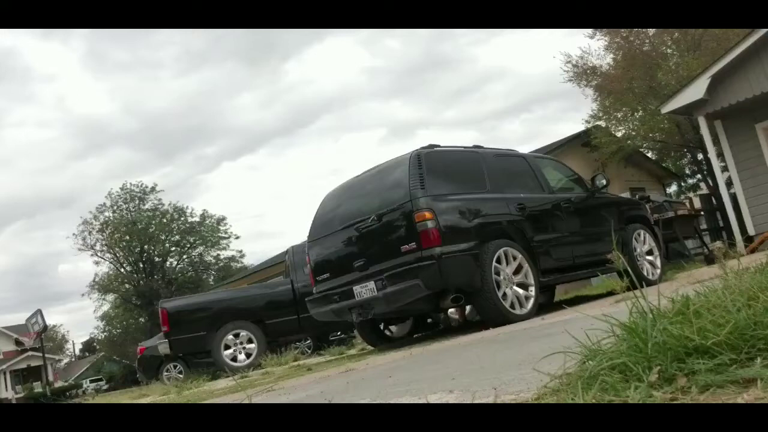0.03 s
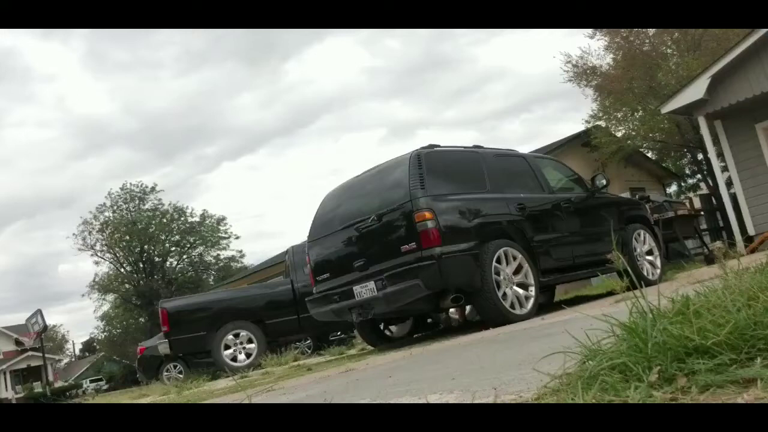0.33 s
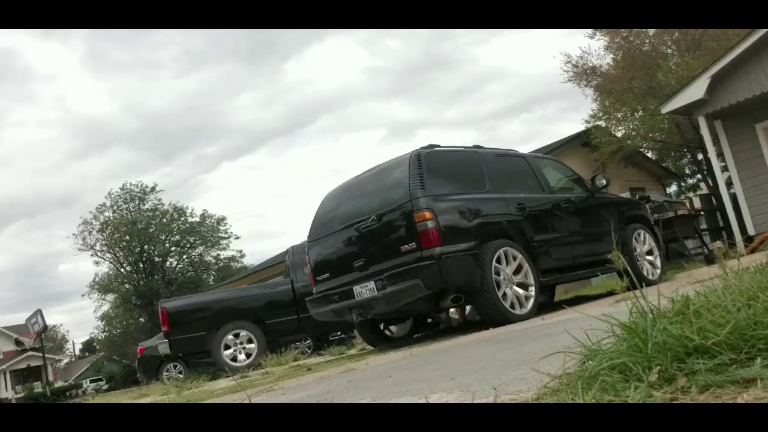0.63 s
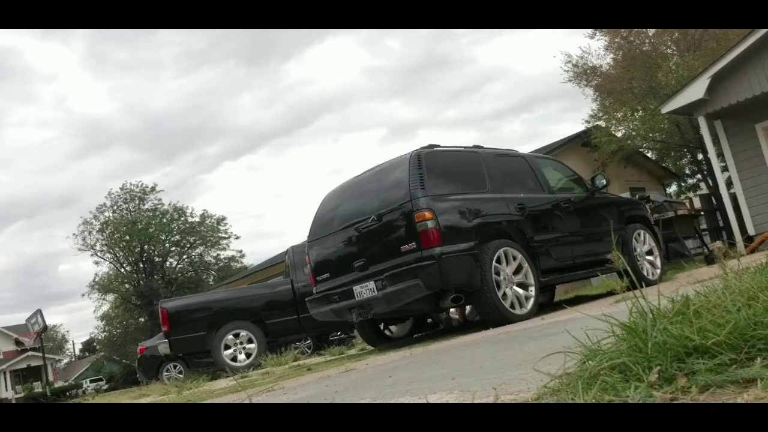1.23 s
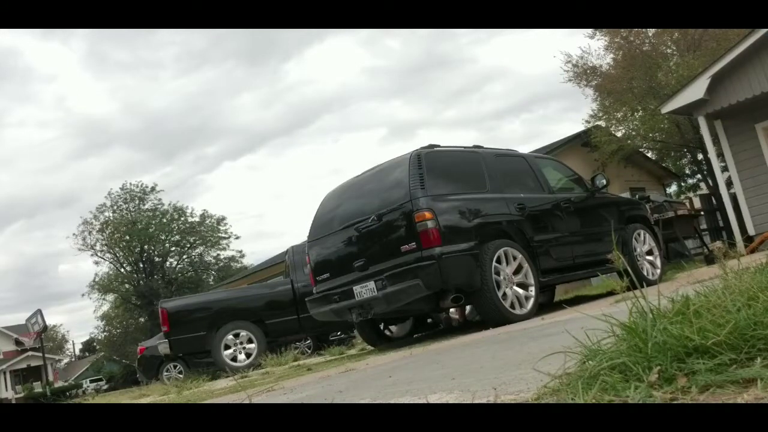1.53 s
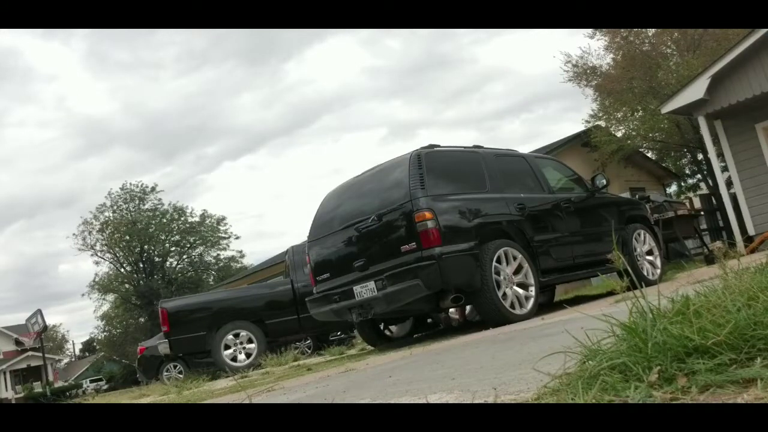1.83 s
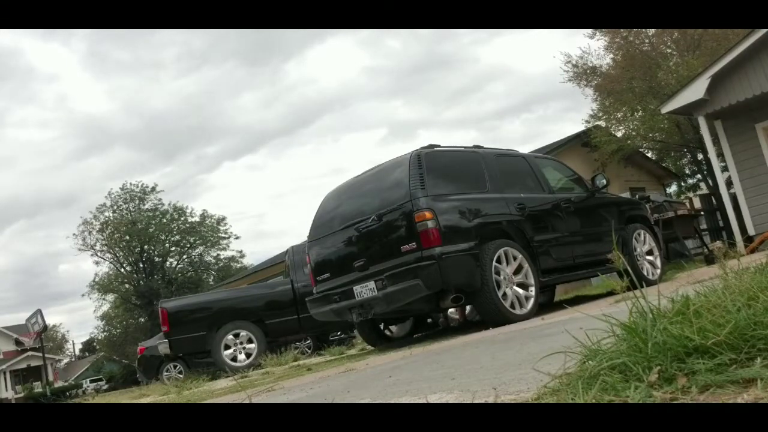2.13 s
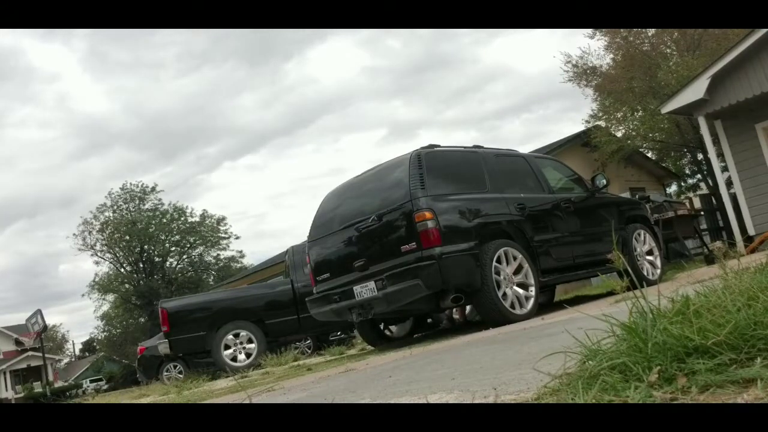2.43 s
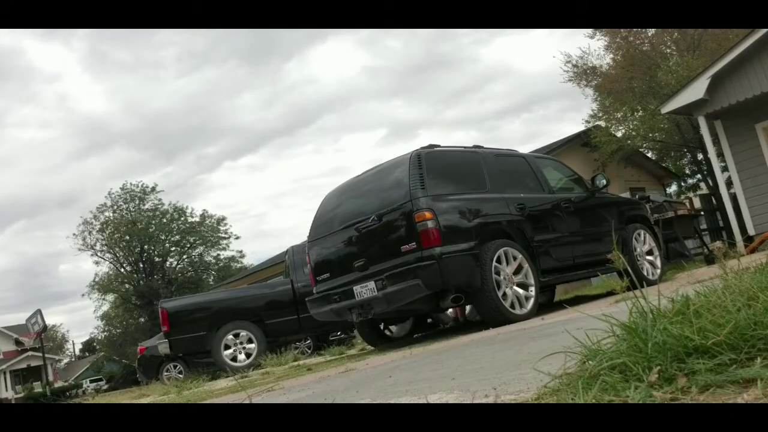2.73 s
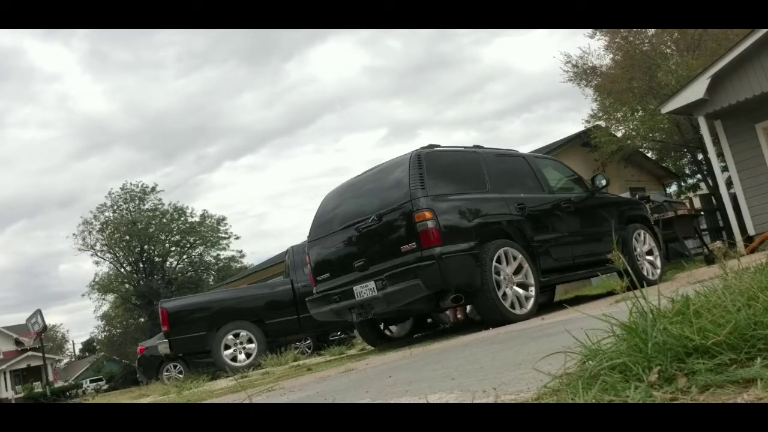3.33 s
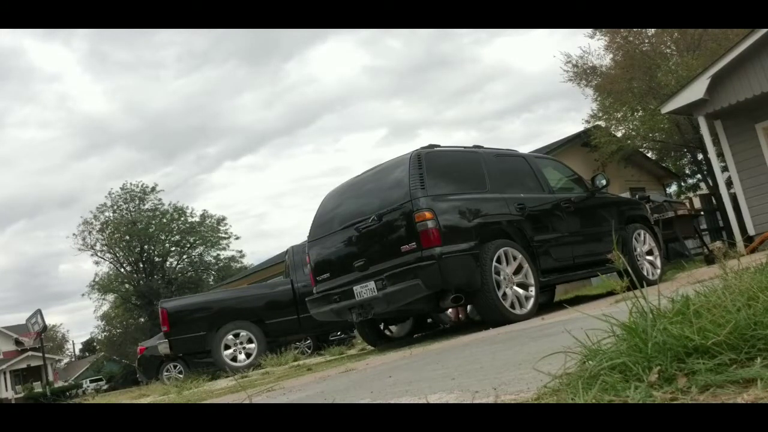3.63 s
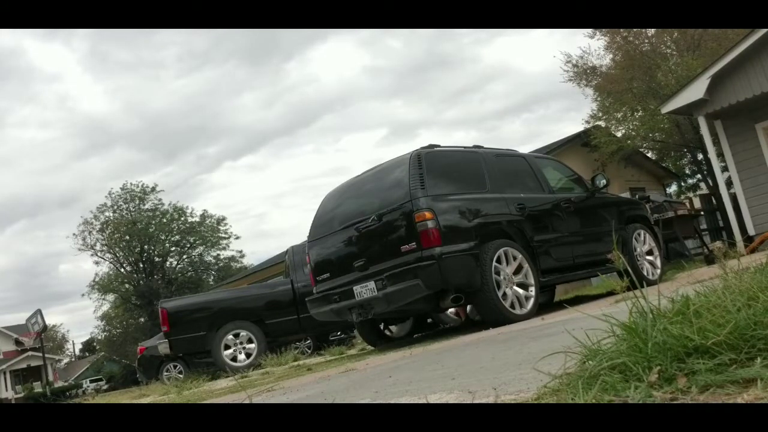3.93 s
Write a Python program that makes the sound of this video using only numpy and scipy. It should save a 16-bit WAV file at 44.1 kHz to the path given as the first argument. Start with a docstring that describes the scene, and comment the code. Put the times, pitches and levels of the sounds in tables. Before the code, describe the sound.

A V8 engine starts in a driveway: the starter clacks and cranks briefly, then it catches with a rasping burst and drops to a loud, lumpy idle with spitting hiss. A second engine idles faintly farther off.

```python
"""An open-exhaust V8 starts from cold in a driveway, heard on a stereo pair of microphones.
The starter clacks in and labours over four compression strokes; the engine catches with a rasping
flare and sinks to a lumpy fast idle. Each firing thumps down the pipe; a leak on one bank spits hiss.
Ground, house and vehicles throw back short echoes. Further off, a second V8 idles throughout."""
import sys
import numpy as np
from scipy import signal
from scipy.fft import rfft, irfft
from scipy.io import wavfile

SR = 44100
rng = np.random.default_rng(int(sys.argv[2]) if len(sys.argv) > 2 else 0)


def generate_wav(sig):
    """Save sig (samples, or channels by samples) to the path in sys.argv[1] as 16-bit PCM at SR."""
    pcm = np.round(np.clip(np.atleast_2d(sig).T, -1, 1) * 32767).astype(np.int16)
    wavfile.write(sys.argv[1], SR, pcm)


N = 176400
T = np.arange(N) / SR
HZ = np.fft.rfftfreq(N, 1 / SR)
STARTER_ON_S, STARTER_OFF_S, CATCH_S = 0.674, 1.3, 1.484


def amp(db):
    """Decibels to gain."""
    return 10 ** (np.asarray(db) / 20)


def unit_rms(x, start_s=0):
    """Scales to rms 1, judged from the start time on."""
    return x / np.sqrt(np.mean(x[..., T >= start_s] ** 2) + 1e-20)


def spectrum(points):
    """Interpolates a table over log frequency."""
    f, value = np.transpose(points)
    return np.interp(np.log(HZ + 1), np.log(f + 1), value)


def colour(x, db):
    """Minimum-phase filter with the given gain in dB."""
    cepstrum = irfft(np.log(amp(np.maximum(db, -100))), N)
    cepstrum[1:N // 2] *= 2
    cepstrum[N // 2 + 1:] = 0
    taps = irfft(np.exp(rfft(cepstrum)), N)[:8192]
    return signal.fftconvolve(np.atleast_2d(x), taps[None], axes=1)[:, :N]


def resonate(x, hz, width_hz):
    """A steep resonance that follows hz, at rms 1."""
    turn = np.exp(2j * np.pi * np.cumsum(hz * np.ones(N)) / SR)
    r = np.exp(-np.pi * width_hz / SR)
    return unit_rms((turn * signal.lfilter([1], [1, -2 * r, r * r], x / turn)).real)


def clicks(times, db):
    """One impulse at each time."""
    at = np.round(times * SR).astype(int)
    keep = (at >= 0) & (at < N)
    return np.bincount(at[keep], amp(db)[keep], N)


def puffs(train, rise_s, fall_s):
    """Each impulse opens quickly and dies away."""
    shape = (1 - np.exp(-T / rise_s)) * np.exp(-T / fall_s)
    return signal.fftconvolve(train, shape / shape.max())[:N]


# Likeness of the two microphones: f/Hz, correlation
MIC_LIKENESS = [(30, 1), (250, 0.9), (500, 0.991), (1000, 0.98), (1800, 0.12), (4000, 0.145),
                (12000, 0.024)]
def noise():
    """White noise at the pair, less alike in the treble."""
    left, other = rfft(rng.standard_normal((2, N)))
    same = np.clip(spectrum(MIC_LIKENESS), -1, 1)
    return irfft(np.array([left, same * left + np.sqrt(1 - same ** 2) * other]), N)


# Cylinders in firing order; one bank hisses most: thump/dB, delay/ms, hiss/dB, burble/dB
CYLINDERS = [(-2, 1.575, -0.5, 0), (2.5, 0.478, -6.5, -14.5), (-1.5, 1.645, 2.5, -20),
             (1.5, 0.309, -18, -24), (5.5, 0.037, -4, -9.5), (-5.5, 1.47, -2.5, -18.5),
             (4, 0.52, -8, -20.5), (-3.5, 1.634, -0.5, -11)]
def firings(rate_hz, start_s, level_spread_db=0.7, time_spread_ms=0.15, hiss_spread_db=1.8):
    """Eight unequal cylinders fire in turn, each firing a little different by chance."""
    count = np.cumsum(rate_hz * (T >= start_s)) / SR
    k = np.arange(int(count[-1]) + 1)
    thump_db, delay_ms, hiss_db, burble_db = np.array(CYLINDERS)[k % len(CYLINDERS)].T
    spreads = [time_spread_ms, level_spread_db, hiss_spread_db]
    slip_ms, stray_db, hiss_stray_db = (rng.standard_normal((512, 3))[k] * spreads).T
    times = T[np.searchsorted(count, k, "right")] + (delay_ms + slip_ms) / 1000
    return times, thump_db + stray_db, hiss_db + hiss_stray_db, burble_db + stray_db


# Colours of the distant engine's thump and rush: f/Hz, relative level/dB
FAR_THUMP = [(25, -34.5), (55, -5.5), (84, 0.5), (130, -4), (190, -9), (260, -18), (450, -21), (1000, -27),
             (4000, -95)]
FAR_RUSH = [(30, -14), (60, -11.5), (110, 2), (180, -4.5), (280, -13.5), (450, -16.5), (780, -15.5),
            (1000, -18.5), (1480, -26), (2200, -37.5), (4000, -50.5), (14000, -52.5)]
def far_engine(firing_hz=83.4):
    """A second V8 idles steadily, dulled by distance."""
    times, thump_db, _, _ = firings(firing_hz, start_s=0)
    thump = unit_rms(colour(clicks(times, thump_db), spectrum(FAR_THUMP)))
    rush = unit_rms(colour(noise(), spectrum(FAR_RUSH)))
    return amp(-39.5) * thump + amp(-40) * rush


# The pinion engaging, then four compression strokes: t/s, rattle/dB, length/s, chug/dB
STROKES = [(0.673, -34.5, .05, -40), (1.044, -40, .07, -42), (1.181, -36.5, 0.055, -37),
           (1.306, -38, 0.05, -40), (1.386, -37, 0.085, -38.5)]
# Colour of the gear rattle: f/Hz, relative level/dB
GEAR_RATTLE = [(330, -30), (480, -0.5), (830, -7.5), (1200, -2.5), (1970, -8.5), (2830, -8.5), (4200, -9.5),
               (4900, -3.5), (6500, -12.5), (7700, -2.5), (8700, -17.5), (12700, -14.5), (15000, -48)]
# Rate of meshing teeth, before the strokes slow it: t/s, f/Hz
GEAR_MESH = [(.674, 390), (.71, 730), (.76, 870), (.81, 980), (.86, 1100), (.91, 980), (.96, 890),
             (1.03, 780), (1.1, 1150), (1.47, 940)]
# Partials of the gear whine: multiple of the mesh rate, level/dB
WHINE_PARTIALS = [(1, -45), (2, -51), (3, -53), (6, -54), (9, -58)]
def starter(whirr_db=-52, free_spin_db=-45.5, rise_s=0.0037, sag=0.15):
    """The gears spin up with a blurred whine and a rattle; each compression slows them and chugs."""
    load, squeeze, since = np.zeros((3, N))
    for start, rattle_db, length, chug_db in STROKES:
        stroke = np.clip((T - start) / rise_s, 0, 1) * np.exp(-((T - start) / length) ** 2)
        load += amp(rattle_db) * stroke
        squeeze += amp(chug_db) * stroke
        since = np.where(T >= start, T - start, since)
    on = np.clip((T - STARTER_ON_S) / 0.0104, 0, 1) * (T < STARTER_OFF_S)
    free_spin = np.exp(-((T - 0.8924) / 0.1) ** 2)  # whirr and whine swell as the starter runs free
    whirr = on * (amp(whirr_db) + amp(free_spin_db) * free_spin)
    rattle = unit_rms(colour(noise(), spectrum(GEAR_RATTLE))) * (load + whirr)
    chug_hz = 330 + 460 * np.exp(-since / 0.063)  # a hollow resonance sinks after each stroke
    chug = squeeze * resonate(noise(), chug_hz, width_hz=510)
    mesh_hz = np.interp(T, *np.transpose(GEAR_MESH)) * (1 - sag * load / load.max())
    whine = sum(amp(db) * resonate(noise(), k * mesh_hz, width_hz=k * 55) for k, db in WHINE_PARTIALS)
    return rattle + chug + whine * on * (0.5 + 0.5 * free_spin)


# Rumble of air in the pipe: f/Hz, relative level/dB
CRANK_RUMBLE = [(20, -20), (45, -10), (80, 2.5), (130, -2.5), (220, -17), (400, -34), (2000, -57)]
def cranking(rise_s=0.14):
    """The turning engine pumps air through the pipe before it fires."""
    swell = np.clip((T - STARTER_ON_S) / rise_s, 0, 1) * (T < STARTER_OFF_S)
    return amp(-38) * swell * unit_rms(colour(noise(), spectrum(CRANK_RUMBLE)))


def crackling(grains_per_s=2700, spread_db=18, share=0.25):
    """Crackling hiss from an exhaust leak on one bank: noise with a dense scatter of sharp grains."""
    size = amp(spread_db * np.minimum(rng.exponential(1, N), 4))
    grains = unit_rms(size * (rng.random(N) < grains_per_s / SR) * rng.choice([-1, 1], N))
    return unit_rms(noise() + share * grains)


def thumps(times, db, corner_hz=150):
    """Strong pressure pulses steepen in the pipe: above the corner their dB differences double."""
    lowpass_db = -10 * np.log10(1 + (HZ / corner_hz) ** 2)
    soft, steep = clicks(times, db), clicks(times, 2 * db)
    return -(steep + colour(soft - steep, lowpass_db))


def burble(times, db, hz=231, rise_s=0.003, fall_s=0.008):
    """Each firing leaves a throaty ring in the pipe; one cylinder rings it hardest."""
    ring = (1 - np.exp(-T / rise_s)) * np.exp(-T / fall_s) * np.sin(2 * np.pi * hz * T)
    return -amp(-16.5) * signal.fftconvolve(clicks(times, db), ring / ring.max())[:N]


# Firing rate of the near engine: t/s, f/Hz
FIRING_RATE = [(1.48, 70.35), (1.56, 60.54), (1.68, 75.77), (1.8, 82.19), (2.0, 84.67), (2.2, 82.38),
               (2.5, 78.62), (2.8, 75.0), (3.1, 71.81), (3.5, 68.35), (4.0, 64.0)]
# Lumpiness, easing as the engine settles: t/s, factor on the thumps' dB and the burble's gain
LOPE = [(1.5, 0.52), (2.3, 0.846), (3.0, 0.64), (3.5, 0.4)]
# Relative strength of the firings: t/s, thump/dB, rasp/dB, hiss/dB
EFFORT = [(1.482, -3.5, 8.5, 7), (1.513, -2.5, 0, 5.5), (1.526, 5, 11.5, 10.5), (1.6, 5.5, 12.5, 9),
          (1.7, 6, 10.5, 6.5), (1.861, 4.5, 5, 1), (2.0, 3, 0.5, 1), (2.5, 0.5, 1, -2), (3.1, 1, 0, -2.5),
          (4.0, 1.5, -1, -2)]
# Resonances of the pipe: f/Hz, width/Hz, lift/dB
PIPE_MODES = [(346.4, 39.4, 8), (423, 19, 1), (543, 22, 2), (649.8, 34.6, 12.5), (792, 31, 5), (975, 30, 5),
              (1172, 28.5, 4.5), (1357, 41.5, 3), (2499, 39, 2.5)]
# Colours of the thump, the turbulent gas in the pipe and the leak's jet: f/Hz, relative level/dB
THUMP_COLOUR = [(20, -38.5), (35, -11), (52, 3), (68, 7), (88, 4.5), (115, 2.5), (145, -5), (180, -2.5),
                (250, -10.5), (320, -21.5), (430, -23), (550, -50.5), (900, -48.5), (2000, -67),
                (8000, -62)]
RASP_COLOUR = [(25, -26.5), (60, -2.5), (120, -5.5), (220, -5.5), (320, -10.5), (430, -6.5), (600, -18.5),
               (1000, -21.5), (1600, -22), (3000, -29), (6000, -28.5), (16000, -96)]
HISS_COLOUR = [(300, -52), (1000, -8), (2000, -7), (2700, 0), (3200, -5), (4100, -2.5), (5500, 1),
               (7500, 1.5), (8700, -2.5), (12000, 0), (15000, -2)]
def near_engine(hiss_lead_s=0.0018, steady_gas=0.61, steady_jet=0.505):
    """In the driveway, every firing sends a thump and a rasping puff down the pipe and spits hiss."""
    rate_hz = np.interp(T, *np.transpose(FIRING_RATE))
    times, thump_db, hiss_db, burble_db = firings(rate_hz, CATCH_S)
    thump_db = thump_db * np.interp(times, *np.transpose(LOPE))
    effort_s, *levels = np.transpose(EFFORT)
    push, gas_gain, jet_gain = (amp(np.interp(T, effort_s, db)) for db in levels)
    running = T >= CATCH_S
    pipe_db = sum(db / (1 + (2 * (HZ - hz) / width) ** 2) for hz, width, db in PIPE_MODES)
    thump = colour(thumps(times, thump_db) * push, spectrum(THUMP_COLOUR) + pipe_db)
    ring = push * np.interp(T, *np.transpose(LOPE)) * burble(times, burble_db)
    gas = puffs(clicks(times, thump_db), rise_s=0.00019, fall_s=0.03) + steady_gas * running
    rasp = colour(gas * gas_gain * noise(), spectrum(RASP_COLOUR) + pipe_db)
    escapes = clicks(times - hiss_lead_s, hiss_db)  # hiss is out before the thump has left the pipe
    jet = puffs(escapes, rise_s=0.00079, fall_s=0.00618) + steady_jet * running
    hiss = colour(jet * jet_gain * crackling(), spectrum(HISS_COLOUR))
    return (amp(-14) * unit_rms(thump, start_s=2.86) + ring
            + amp(-28.5) * unit_rms(rasp, start_s=1.675)
            + amp(-34.5) * unit_rms(hiss, start_s=3))


# Sharpest spits of the exhaust hiss: t/s, relative level/dB
SPITS = [(1.4853, -16.5), (1.511, -20), (1.8043, -21), (2.0086, -18.5), (2.4219, -22), (2.7317, -22),
         (2.837, -22), (2.919, -24), (3.055, -20.5), (3.2534, -24), (3.367, -24), (3.7504, -21.5),
         (3.8426, -22)]
def spits(ticks_per_s=35):
    """Now and then the hot exhaust cracks out brightly, among small random ticks."""
    bright_db = spectrum([(500, -26), (3000, -13), (7000, -0.5), (14000, -6.0)])
    bright = unit_rms(colour(crackling(), bright_db))
    size = amp(-34.5 + 0.5 * np.minimum(rng.exponential(1, N), 2))
    ticks = size * (rng.random(N) < ticks_per_s / SR) * (T > CATCH_S)
    cracks = amp(-3.5) * puffs(clicks(*np.transpose(SPITS)), rise_s=0.00062, fall_s=0.0038)
    return bright * (cracks + puffs(ticks, rise_s=0.00043, fall_s=0.0013))


# Barks as the engine catches: t/s, f/Hz, width/Hz, level/dB, fall/s
BARKS = [(1.491, 2620, 150, -35, .012), (1.532, 1260, 350, -25, .022), (1.55, 2700, 900, -25, .012),
         (1.565, 620, 400, -23, .03), (1.58, 1150, 600, -25, .011)]
def barks(rise_s=0.0011):
    """The first hard firings bark and ring briefly in the pipe."""
    return sum(resonate(noise(), hz, width) * puffs(clicks(np.array([start]), [db]), rise_s, fall)
               for start, hz, width, db, fall in BARKS)


# Two snaps late in the idle: t/s, level/dB
SNAPS = [(3.630, -16), (3.636, -21)]
def snaps():
    """One very short, very bright double tick."""
    envelope = puffs(clicks(*np.transpose(SNAPS)), rise_s=0.0002, fall_s=0.0012)
    return envelope * resonate(noise(), hz=13000, width_hz=4000)


# Echoes off ground, house and vehicles: delay t/s, level/dB
ECHOES = [(0.0168, -19), (0.0334, -12.5), (.052, -31.5)]
def driveway(x, t60_s=0.399, scatter_db=-7):
    """The open-air spot adds a few hard echoes and a short scatter above the bass."""
    tail_db = spectrum([(300, -30), (1000, 0)]) + spectrum([(3000, -1.5), (14000, -5.5)])
    tail = colour(noise(), tail_db) * amp(-60 * T / t60_s) * (T > 0.006)
    taps = amp(scatter_db) * tail / np.linalg.norm(tail[0]) + clicks(*np.transpose(ECHOES))
    return x + signal.fftconvolve(x, taps, axes=1)[:, :N]


# Left microphone over the right: f/Hz, level/dB
LEFT_LEVEL = [(60, 1.1), (280, 1.8), (550, .7), (1000, 1.8), (2300, 3.3), (5000, 2.6), (8000, 4.7),
              (14000, 4)]
# Lead of the left microphone: f/Hz, phase/rad
LEFT_LEAD = [(20, 0), (70, .1), (250, .33), (550, .6), (1000, 1.4), (1640, 2.2), (2840, 6.2), (4000, 8.6),
             (5680, 12), (8000, 16.6), (11500, 22.5), (15000, 29)]
def scene():
    """Both engines, near and far, stand a little left of the microphones' axis."""
    near = near_engine() + spits() + snaps() + barks() + starter() + cranking()
    both = rfft(driveway(near) + far_engine(), axis=1)
    left = amp(spectrum(LEFT_LEVEL) / 2)
    right = np.exp(-1j * spectrum(LEFT_LEAD)) / left
    return irfft(both * np.array([left, right]), N)


def record(dry, open_s=0.115, cutoff_hz=14850):
    """The microphones open after a moment; peaks are rounded off and the top treble is cut."""
    rounded = dry / (1 + dry ** 8) ** (1 / 8)
    lowpass = signal.firwin(401, cutoff_hz, window=("kaiser", 9), fs=SR)
    return signal.oaconvolve(rounded * (T >= open_s), lowpass[None], "same")


dry = scene()
out = record(dry)
generate_wav(out)
```